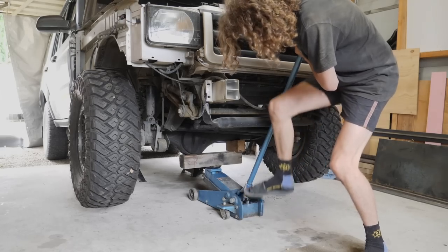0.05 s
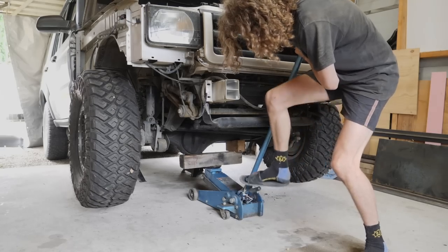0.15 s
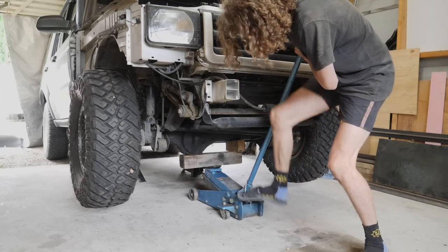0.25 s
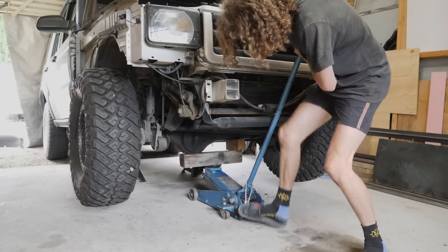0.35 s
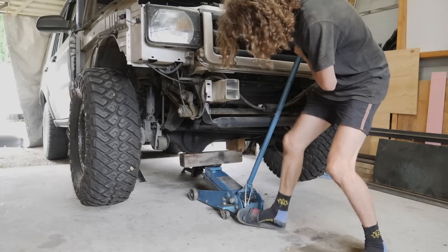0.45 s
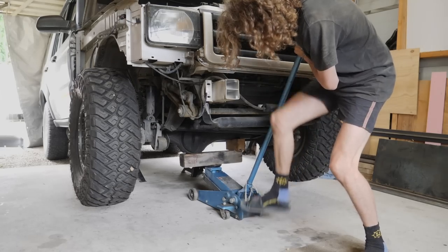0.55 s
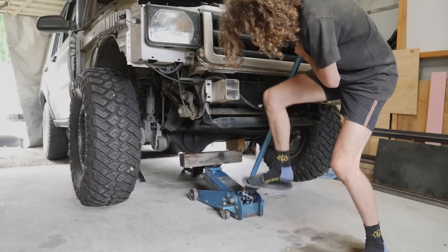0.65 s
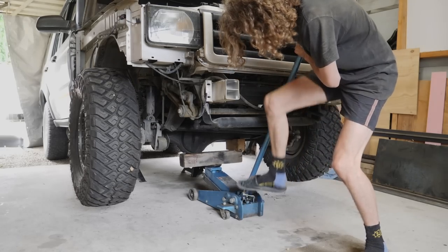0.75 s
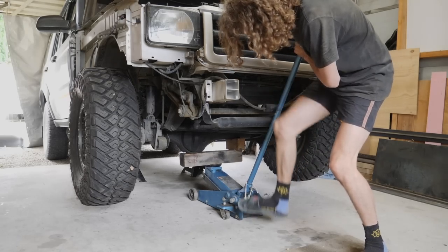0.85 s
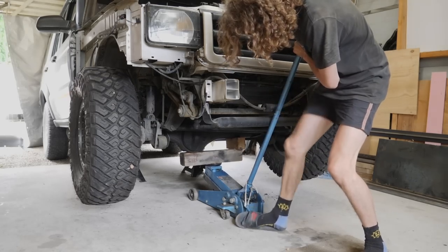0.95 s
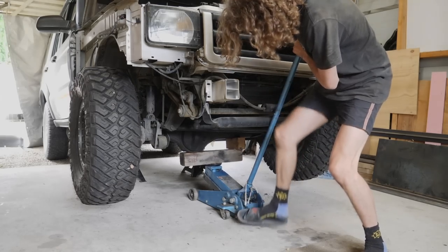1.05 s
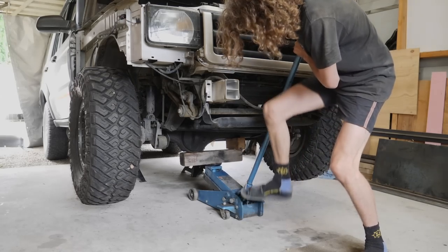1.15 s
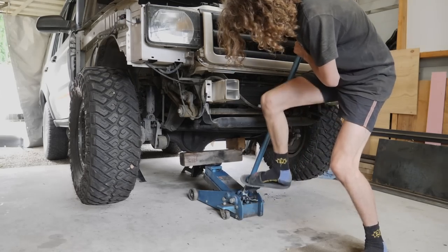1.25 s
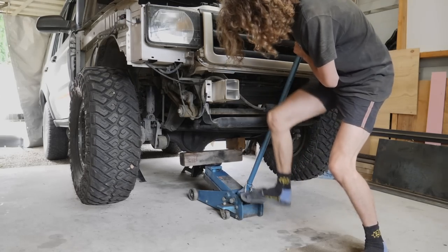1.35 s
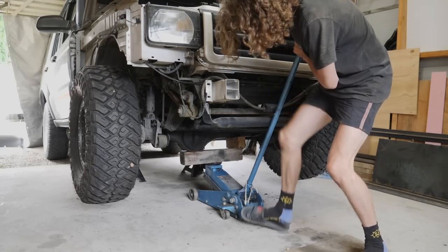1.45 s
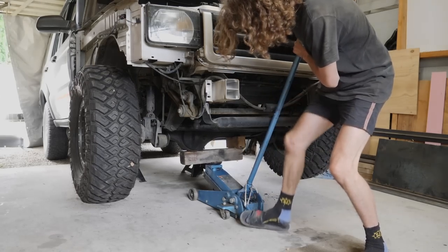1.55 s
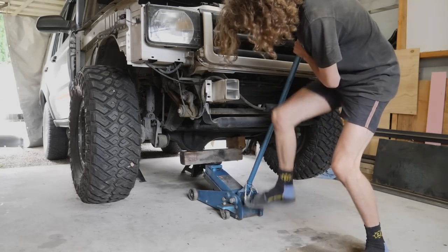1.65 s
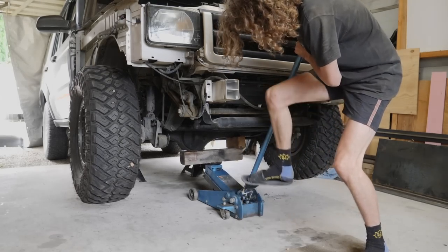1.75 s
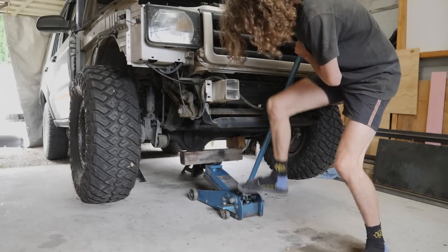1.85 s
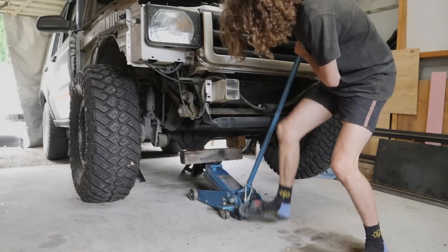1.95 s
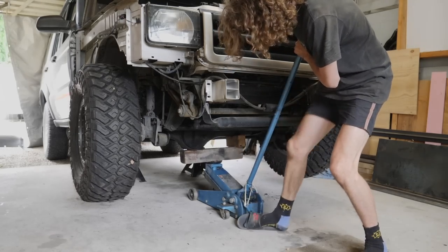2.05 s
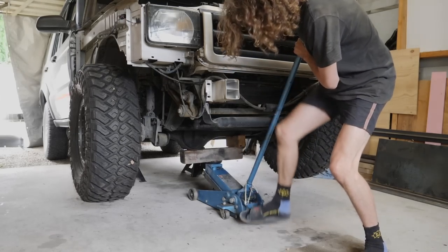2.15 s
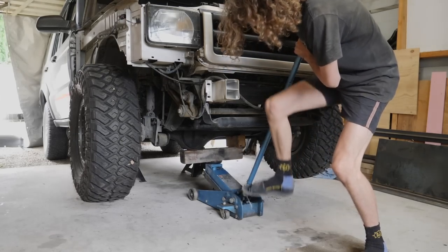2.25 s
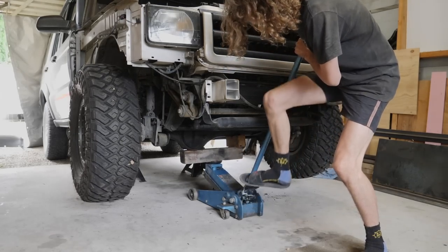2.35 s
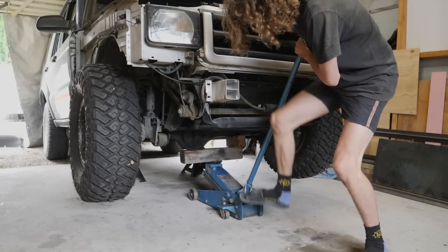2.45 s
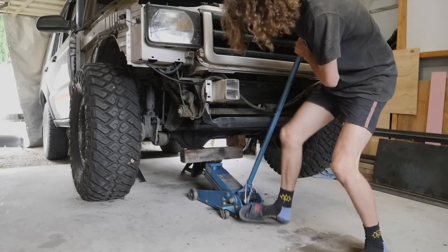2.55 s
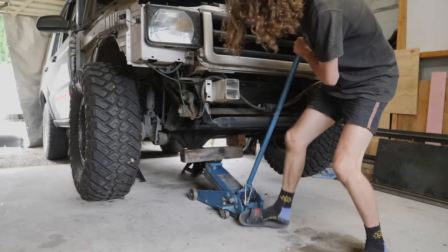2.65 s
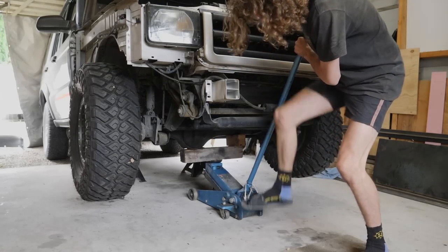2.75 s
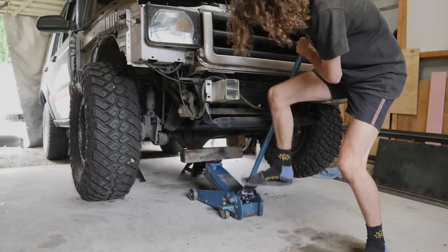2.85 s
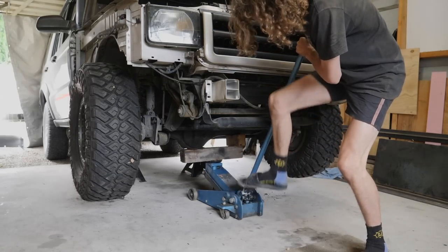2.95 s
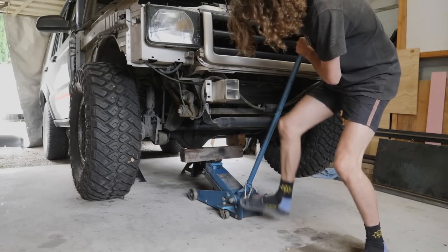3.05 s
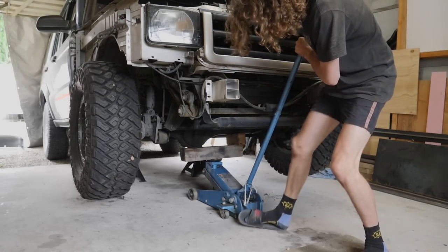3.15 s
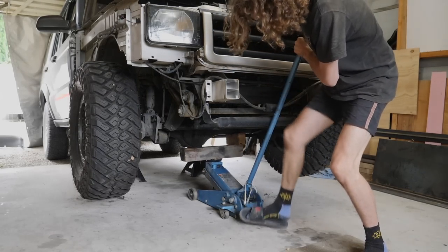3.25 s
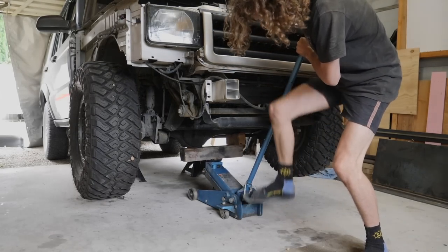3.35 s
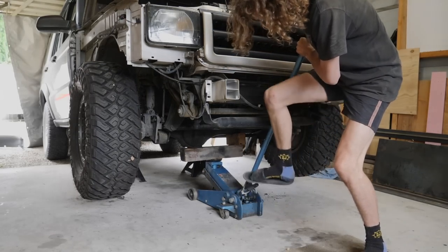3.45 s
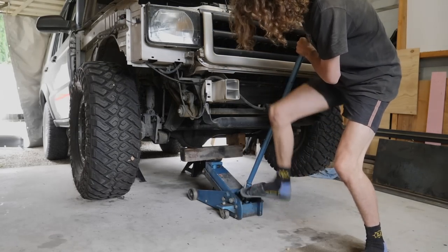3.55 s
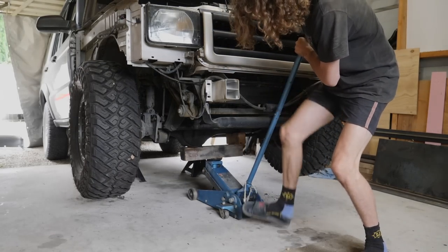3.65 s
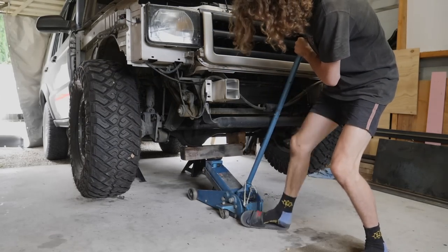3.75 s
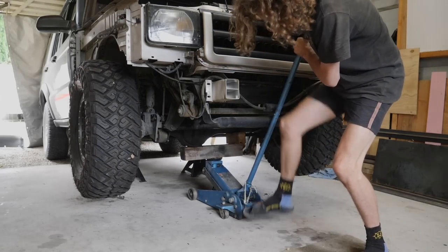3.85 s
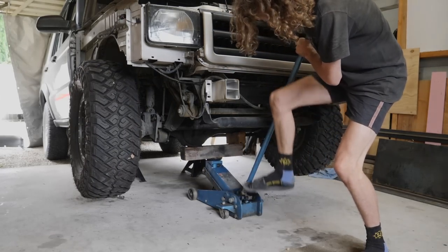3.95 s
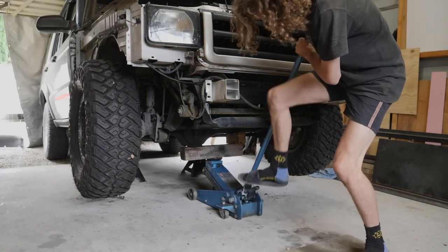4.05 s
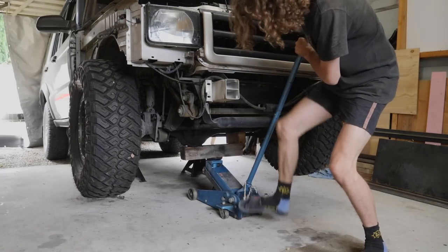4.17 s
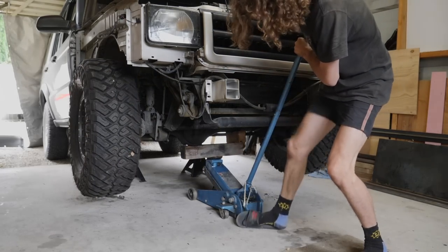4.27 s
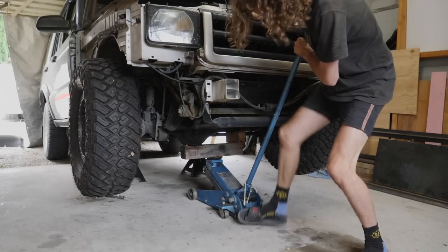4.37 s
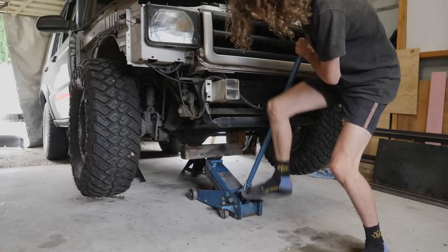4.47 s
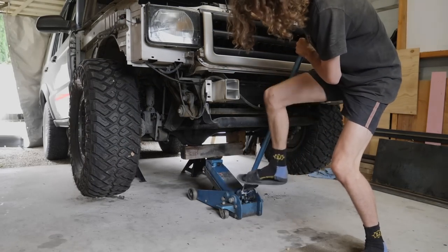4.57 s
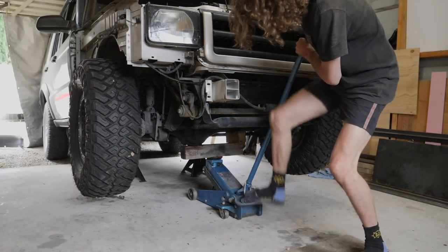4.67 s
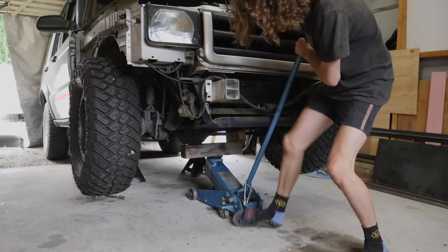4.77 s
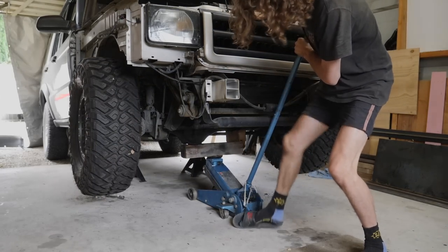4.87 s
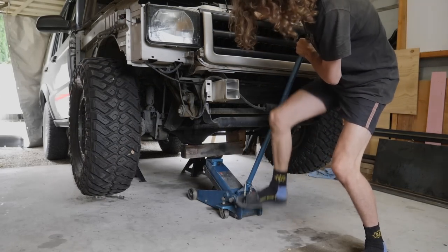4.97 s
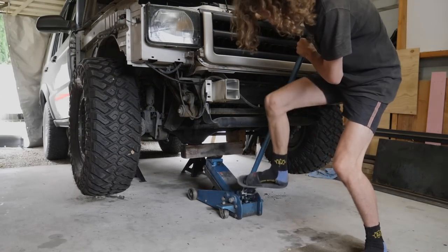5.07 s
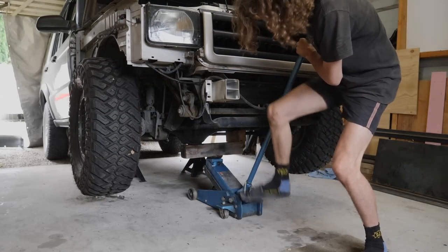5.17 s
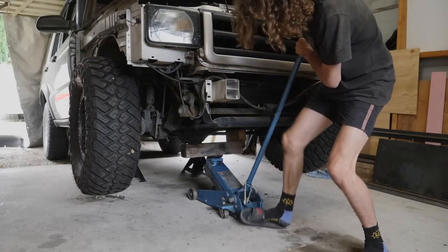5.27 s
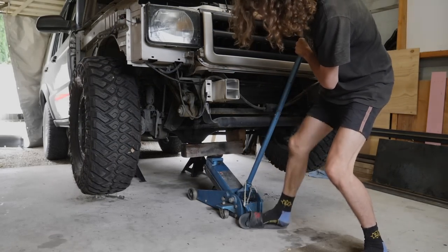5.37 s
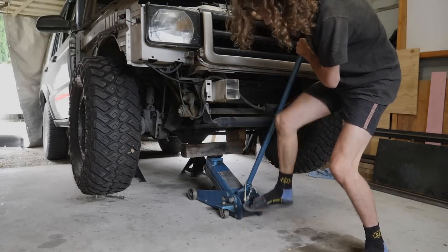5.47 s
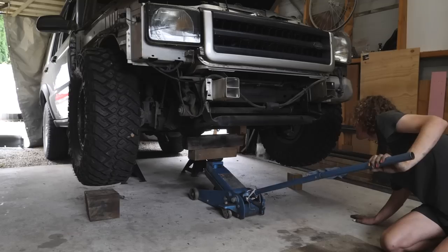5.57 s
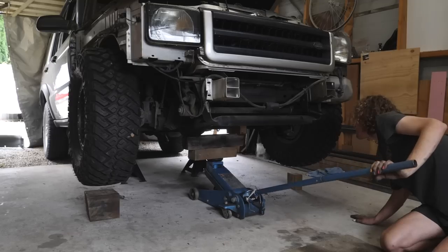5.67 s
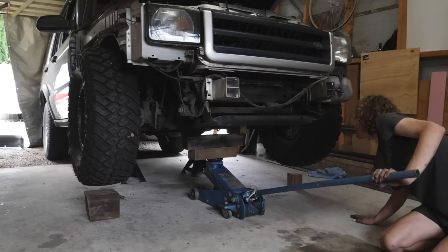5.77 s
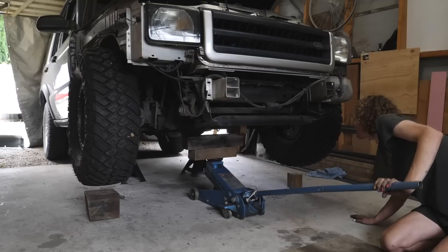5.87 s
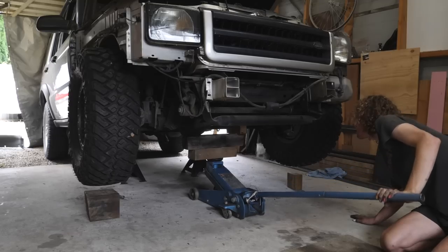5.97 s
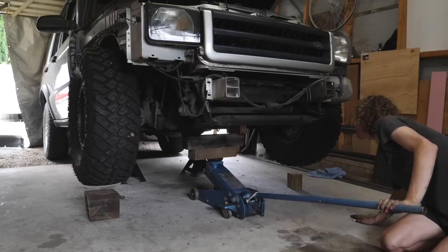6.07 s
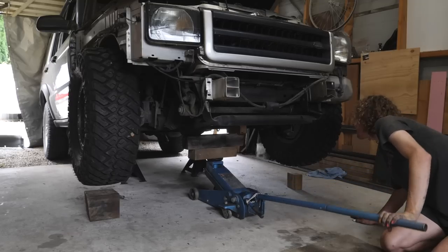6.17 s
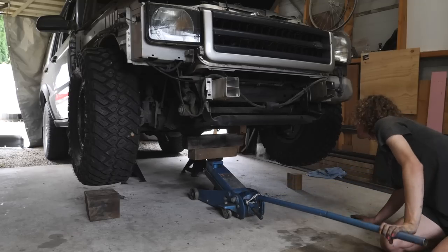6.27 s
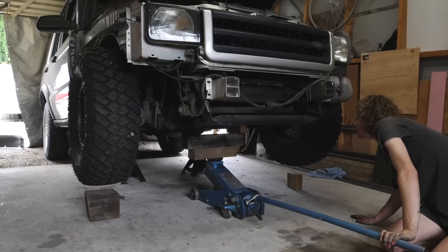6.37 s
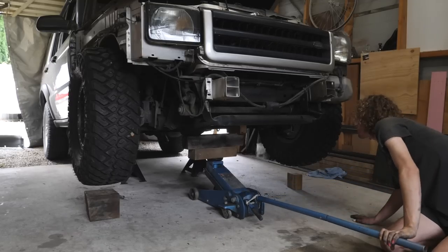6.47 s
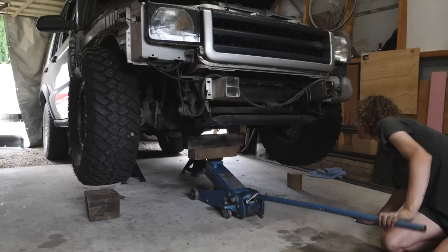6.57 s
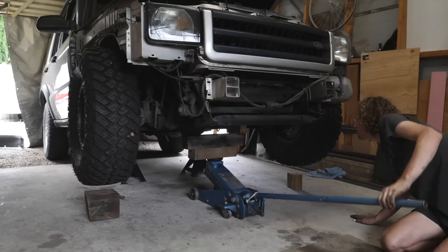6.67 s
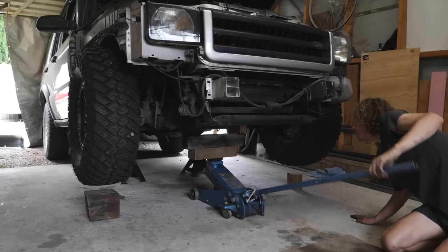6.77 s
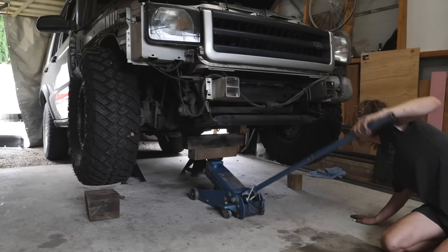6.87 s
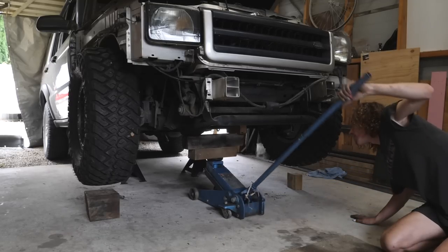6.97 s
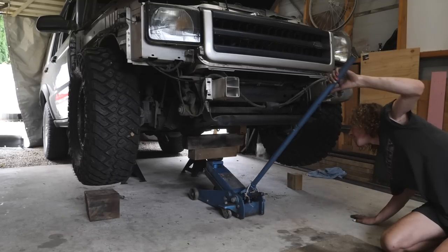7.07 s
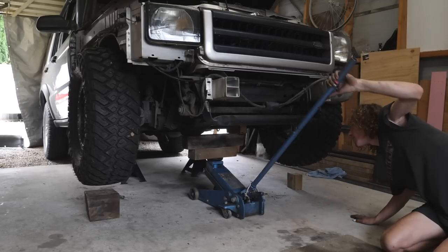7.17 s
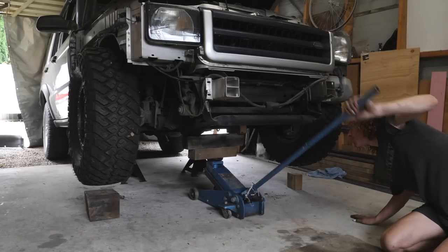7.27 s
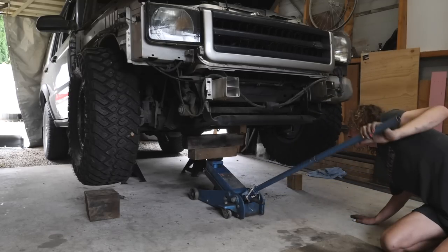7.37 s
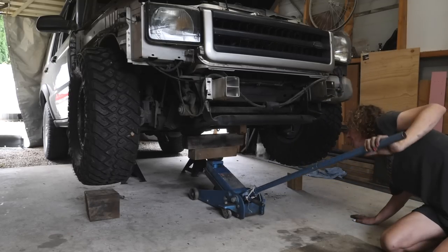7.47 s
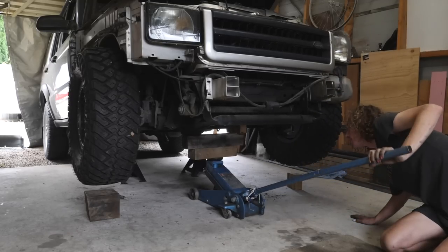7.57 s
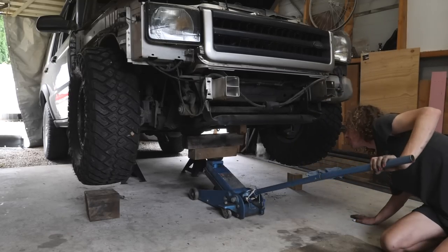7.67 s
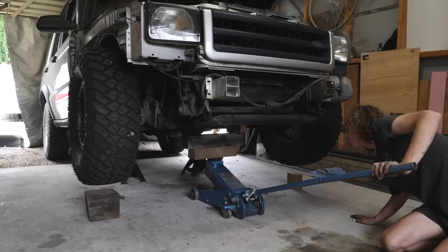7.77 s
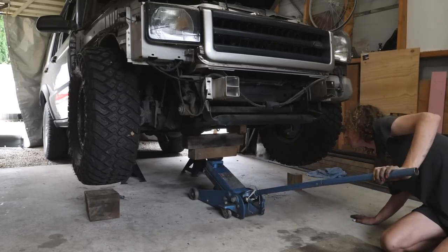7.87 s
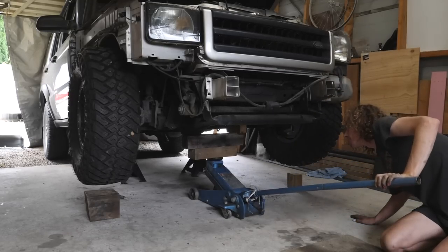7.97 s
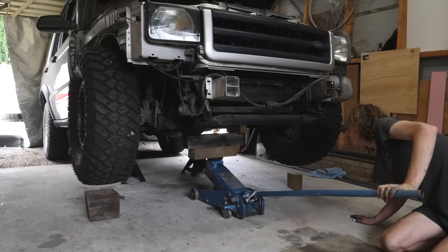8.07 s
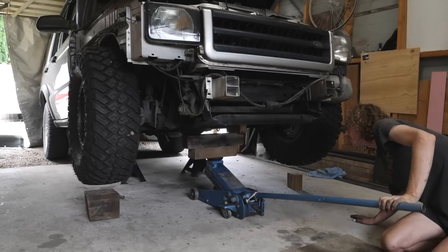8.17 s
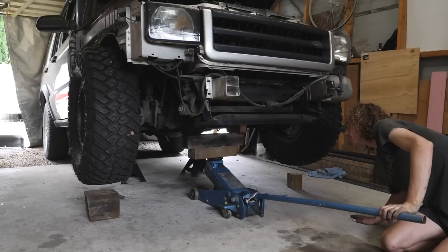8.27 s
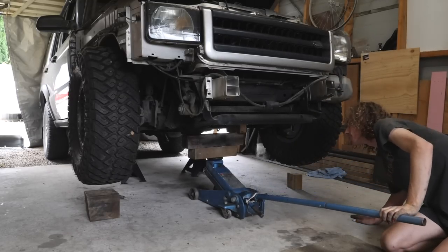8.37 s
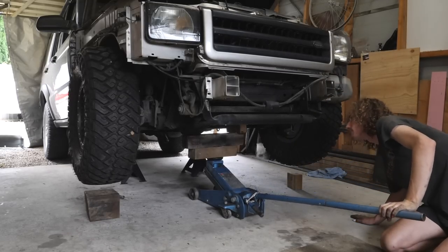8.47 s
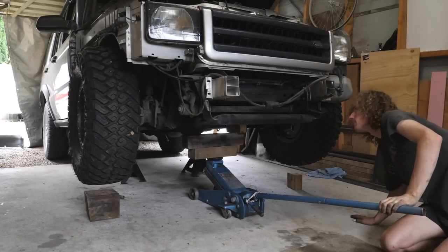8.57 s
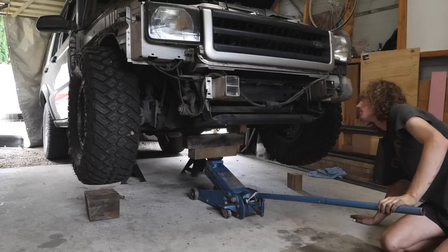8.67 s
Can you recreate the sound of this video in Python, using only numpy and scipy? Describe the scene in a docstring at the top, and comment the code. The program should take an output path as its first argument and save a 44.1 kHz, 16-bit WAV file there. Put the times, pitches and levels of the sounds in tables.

```python
"""A foot pumps the pedal of a steel floor jack about 1.8 times a second to lift a car in a garage: the linkage
clanks against the frame, a loose link clinks, the blows thud through the floor. After an abrupt cut the long
handle is worked slowly: the pivot creaks and groans, the tube ticks, the pump gulps oil.
Steel is noise chatter ringing resonant filters, thuds are short low pushes, friction and air are coloured noise."""
import sys
import numpy as np
from scipy import signal
from scipy.fft import rfft, irfft, next_fast_len
from scipy.io import wavfile
from scipy.ndimage import map_coordinates

SR = 44100
rng = np.random.default_rng(int(sys.argv[2]) if len(sys.argv) > 2 else 0)


def digitize_waveform(pressure):
    """Quantize a signal to 16-bit integers and store it at the path in sys.argv[1].

    Rows of a 2-D input are taken as channels; values are limited to [-1, 1].
    """
    field = np.atleast_2d(pressure).T
    bounded = np.clip(field, -1, 1)
    quanta = np.round(bounded * 32767).astype(np.int16)
    wavfile.write(sys.argv[1], SR, quanta)


N = 384552
CUT_S = 5.522  # pedal before, handle after
SIZE = 24000  # samples in one sound event
TIME = np.arange(N) / SR
AGE = np.arange(SIZE) / SR  # seconds since an event began
HZ = np.fft.rfftfreq(SIZE, 1 / SR)


def amp(db):
    """Decibels to gain."""
    return 10 ** (np.asarray(db) / 20)


def unit_rms(x):
    """Scale to rms 1."""
    return x / np.sqrt(np.mean(x ** 2) + 1e-20)


def unit_energy(x):
    """Scale to energy 1."""
    return x / (np.linalg.norm(x) + 1e-20)


def along(points, hz):
    """Join (Hz, value) points on a log frequency axis."""
    f, v = np.transpose(points)
    return np.interp(np.log(hz + 1), np.log(f + 1), v)


def curve(rows):
    """Join (s, value) points, one value per sample."""
    return np.interp(TIME, *np.transpose(rows))


def add(track, s, sound):
    """Mix a sound in at time s; what starts before the cut ends there."""
    start = max(round(s * SR), 0)
    limit = round(CUT_S * SR) if s < CUT_S else N
    end = min(start + len(sound), limit)
    track[start:end] += sound[:end - start]


def coloured(x, spectrum):
    """Give a whole track a spectrum, at rms 1."""
    m = next_fast_len(N + SIZE)
    gain = amp(along(spectrum, np.fft.rfftfreq(m, 1 / SR)))
    return unit_rms(irfft(rfft(x, m) * gain, m)[:N])


def body(spectrum, modes=()):
    """Gain of an object over HZ: a broad colour with resonant peaks, mean power 1."""
    peaks_db = sum(db / (1 + (2 * (HZ - hz) / width) ** 2) for hz, width, db in modes)
    return unit_rms(amp(along(spectrum, HZ) + peaks_db))


def ring(force, gain):
    """Pass a force through the causal filter with this gain, so that peaks ring after the blow."""
    cepstrum = irfft(np.log(np.maximum(gain, 1e-6)))
    # folding the cepstrum forward in time makes the filter minimum phase
    cepstrum[1:SIZE // 2] *= 2
    cepstrum[SIZE // 2 + 1:] = 0
    return irfft(rfft(force) * np.exp(rfft(cepstrum)))


def garage(build_s=0.0014):
    """A fresh reverberant tail of energy 1: noise that dies at its own pace in each band."""
    # Decay time of the room: f/Hz, t60/s
    decay = [(100, 0.25), (250, 0.4), (600, 0.28), (1700, 0.24), (4800, 0.25), (11000, 0.21)]
    hz, t, z = signal.stft(rng.standard_normal(SIZE), SR, nperseg=256)
    fade = amp(-60 * t / along(decay, hz)[:, None])
    tail = signal.istft(z * fade, SR, nperseg=256)[1][:SIZE]
    return unit_energy(tail * (1 - np.exp(-AGE / build_s)))


def chatter(t60, crack, crack_t60=0.0073, rise_s=0.0013):
    """Steel meeting steel: a first crack, then a dying run of uneven micro-bounces."""
    bounces = rng.standard_normal(SIZE) * rng.exponential(size=SIZE) * amp(-60 * AGE / t60)
    first = rng.standard_normal(SIZE) * amp(-60 * AGE / crack_t60)
    seating = 1 - np.exp(-AGE / rise_s)
    return unit_energy(unit_energy(bounces * seating) + crack * unit_energy(first * seating))


def strike_point(depth_db):
    """Each contact lands on a new spot and favours other narrow modes; in the treble they even out."""
    mode_number = 36 * np.log1p(HZ / 900)
    favour = map_coordinates(rng.standard_normal(128), [mode_number], mode="mirror")
    return depth_db / (1 + (HZ / 5500) ** 2) * favour


def contact(gain, t60, crack, room_db):
    """One blow: the chatter rings the steel, heard directly and through the garage."""
    # Share of the energy that arrives directly: f/Hz, share
    direct_share = [(500, 0.3), (1700, 0.16), (4800, 0.51), (11000, 0.75)]
    share = np.clip(along(direct_share, HZ), 0, 1)
    direct = rfft(chatter(t60, crack)) * np.sqrt(share)
    walls = rfft(garage()) * np.sqrt(1 - share) * amp(room_db)
    uneven = gain * amp(strike_point(3.0))
    same_energy = np.linalg.norm(gain) / np.linalg.norm(uneven)
    return ring(irfft(direct + walls), uneven * same_energy)


def blows(rows, force, steel, t60, crack, room_db, gain_db, low_hz=260):
    """Contacts (s, dB, dB per octave) of one kind on one steel part; small parts radiate little bass."""
    track = np.zeros(N)
    radiated = HZ ** 2 / np.sqrt(HZ ** 4 + low_hz ** 4)
    octaves = np.log2(np.clip(HZ, 550, 11000) / 2500)
    for s, db, brightness in rows:
        hardness = amp(db + gain_db + along(force, HZ) + brightness * octaves)
        add(track, s, contact(steel * hardness * radiated, t60, crack, room_db))
    return track


def alike(times, levels_db):
    """Rows (s, dB, brightness) of blows that share one colour."""
    return [(s, db, 0) for s, db in np.broadcast(times, levels_db)]


def background(pedal_db=-49.5, handle_db=-50.5, waver_db=3):
    """Air through the open door is shaped noise; after the cut a faint hum and a thin, wavering hiss join it."""
    # Air before the cut: f/Hz, level/dB
    air_pedal = [(15, -49), (25, -17), (134, 6.5), (236, -7.5), (427, -1.5), (545, -3), (1190, -3),
                 (1560, -12), (1840, -8), (5000, -15.5), (7510, -25.5), (14000, -33), (16000, -48)]
    # Air after the cut: f/Hz, level/dB
    air_handle = [(15, -50), (25, -21), (102, -3.5), (161, -11.5), (217, -6), (242, -13.5), (476, -12),
                  (575, -17.5), (754, -11.5), (2910, -33.5), (3620, -27), (3920, -30), (6210, -33),
                  (6740, -38), (16000, -40)]
    # Faint steady tone after the cut: f/Hz, rms level/dB
    hum_tones = [(102.3, -65.5)]
    # Colour of the narrow hiss: f/Hz, level/dB
    whisper_colour = [(3000, -45), (3470, -9), (3530, 11), (3630, 4), (3720, -25), (4300, -45)]
    # Course of the hiss, before its waver: t/s, level/dB
    whisper_level = [(5.53, -78), (5.72, -69), (5.92, -63), (6.3, -66), (6.6, -71), (7.4, -68), (7.55, -59),
                     (7.8, -70), (8.72, -71)]
    before = amp(pedal_db) * coloured(rng.standard_normal(N), air_pedal)
    after = amp(handle_db) * coloured(rng.standard_normal(N), air_handle)
    hum = sum(amp(db) * np.sqrt(2) * np.sin(2 * np.pi * hz * TIME) for hz, db in hum_tones)
    waver = waver_db * map_coordinates(rng.standard_normal(60), [TIME * 5], mode="mirror")
    whisper = amp(curve(whisper_level) + waver) * coloured(rng.standard_normal(N), whisper_colour)
    return np.where(TIME < CUT_S, before, after + hum + whisper)


def rubbing(lump_hz=30, lump_db=3):
    """A dull, uneven friction that swells and fades as the handle moves."""
    # Soft rubs: middle t/s, half length/s, peak level/dB
    rubs = [(5.93, 0.21, -52.5), (7.14, 0.035, -42.5), (7.684, 0.032, -42.5), (7.854, 0.031, -49)]
    # Colour of the rub: f/Hz, level/dB
    rub_colour = [(100, -30), (280, -8), (420, 2), (600, -7.5), (900, -1.5), (1400, -25), (3000, -21.5),
                  (15000, -75)]
    lumps = amp(lump_db * map_coordinates(rng.standard_normal(600), [TIME * lump_hz], mode="mirror"))
    swells = sum(amp(db) / (1 + ((TIME - s) / half_s) ** 2) for s, half_s, db in rubs)
    friction = unit_rms(lumps * coloured(rng.standard_normal(N), rub_colour))
    return (TIME > CUT_S) * swells * friction


def sliding(gain_db=-5, grain=1.0):
    """Steel slides on steel in the moving joints: noise of very uneven, fine grains."""
    # Course of the sliding, before the gain: t/s, level/dB
    slide_level = [(0, -57), (1.6, -56), (1.85, -36), (2.4, -47), (2.7, -66), (3.9, -52), (4.6, -41.5),
                   (5.35, -49), (5.53, -55.5), (6.55, -55.5), (6.88, -44), (7.05, -45), (7.4, -37),
                   (7.55, -49), (7.75, -50.5), (8.1, -54.5), (8.72, -49.5)]
    # Colour of the scrape: f/Hz, level/dB
    scrape_colour = [(200, -42), (800, -0.5), (1500, -6.5), (3500, -11), (6000, -20.5), (8000, -27),
                     (15000, -40)]
    grains = rng.standard_normal(N) * np.exp(grain * rng.standard_normal(N))
    return amp(curve(slide_level) + gain_db) * coloured(grains, scrape_colour)


def gulps(t60=0.79, rise_s=0.0039, dull_s=0.29):
    """Oil is drawn through the valve as the handle turns upward: a rush that dulls as the flow dies."""
    # Gulps: t/s, level/dB
    draws = [(6.408, -26), (8.430, -26.5)]
    # Colour of the oil: f/Hz, level/dB
    oil_colour = [(88, -52), (150, -21), (305, -11.5), (516, -1), (747, -5), (858, 3), (1170, -5),
                  (1520, -8.5), (1670, -14), (3830, -31.5), (6000, -55), (7800, -73), (13200, -120)]
    track = np.zeros(N)
    for s, db in draws:
        rush = unit_rms(ring(rng.standard_normal(SIZE), body(oil_colour)))
        dull = signal.lfilter(*signal.butter(2, 900, fs=SR), rush)
        bright = np.exp(-AGE / dull_s)
        flow = (1 - np.exp(-AGE / rise_s)) * amp(db - 60 * AGE / t60)
        add(track, s, flow * (bright * rush + (1 - bright) * dull))
    return track


def groan(slip_hz=135, scatter=0.35, pivot_hz=1210, width_hz=90, boost_db=9, room_db=-1):
    """The dry pivot sticks and slips at the top of the stroke; uneven slips ring one strong resonance."""
    # Course of the groan: t/s, level/dB
    groan_level = [(7.340, -22), (7.346, -17.5), (7.354, -16), (7.369, -17.5), (7.385, -31), (7.41, -35),
                   (7.44, -61)]
    # Colour of the pivot: f/Hz, level/dB
    pivot_colour = [(120, -32), (200, -27), (941, -12), (1200, -4), (1340, -9.5), (1850, -19.5),
                    (2080, -19), (2350, -29), (3980, -43), (5000, -37), (6500, -40), (11000, -120)]
    wander = map_coordinates(rng.standard_normal(2000), [TIME * slip_hz], order=1)
    rate = slip_hz * np.exp(scatter * wander)
    slips = np.diff(np.floor(np.cumsum(rate) / SR), prepend=0)
    pivot = body(pivot_colour, [(pivot_hz, width_hz, boost_db)])
    answer = ring((AGE == 0) + amp(room_db) * garage(), pivot)
    sounding = (TIME > groan_level[0][0]) * (TIME < groan_level[-1][0])
    force = slips * np.sqrt(SR / slip_hz) * amp(curve(groan_level)) * sounding
    return signal.fftconvolve(force, unit_energy(answer))[:N]


def creaks(t60=0.063, crack=0.23, room_db=-4, gain_db=27.5):
    """The handle catches in its pivot as it is raised: short rasping slips, sharper near the top."""
    # Catches, before the gain: t/s, level/dB
    catches = [(6.300, -25.5), (6.806, -31.5), (6.853, -26.5), (6.904, -28), (7.109, -34), (7.126, -26.5),
               (7.176, -26), (7.197, -32), (7.230, -28), (7.263, -25), (7.282, -29.5), (7.298, -26.5)]
    # Broad colour of the pivot's creak: f/Hz, level/dB
    creak_colour = [(40, -43), (300, -10), (650, -5.5), (1000, 3.5), (1500, -4), (2000, -4), (2700, 0.5),
                    (4200, -10), (6000, -13.5), (7500, -33), (15000, -39.5)]
    # Its resonances: f/Hz, width/Hz, boost/dB
    creak_modes = [(1260, 150, 6), (1780, 78, 1), (2520, 150, 1.5)]
    # Treble of the slips along the stroke: t/s, level/dB
    creak_treble = [(6.3, -7), (7.2, -6), (7.27, 2)]
    track = np.zeros(N)
    steel = body(creak_colour, creak_modes)
    for s, db in catches:
        treble_db = np.interp(s, *np.transpose(creak_treble))
        tilt_db = along([(1700, 0), (4800, treble_db)], HZ)
        add(track, s, contact(steel * amp(db + gain_db + tilt_db), t60, crack, room_db))
    return track


def ticks():
    """The handle tube shifts in its socket: light, crisp contacts ring it."""
    # Ticks, before the gain: t/s, level/dB
    shifts = [(5.904, -41.5), (6.951, -42.5), (7.435, -23.5), (7.535, -44.5), (7.6, -33.5), (8.096, -52),
              (8.185, -35), (8.307, -41), (8.64, -42.5)]
    # Broad colour of the tube: f/Hz, level/dB
    handle_colour = [(40, 6), (600, -6), (1200, 1.5), (2500, -3), (5000, -14.5), (9000, -23.5),
                     (15000, -21.5)]
    # Its resonances: f/Hz, width/Hz, boost/dB
    handle_modes = [(1010, 89, 3.6), (1079, 60, 10.6), (1377, 45, 9), (1805, 65, 9.2), (2420, 46, 9.3),
                    (3523, 370, 20), (4660, 280, 8.7), (5140, 660, 16.4), (7160, 180, 11), (7840, 550, 12)]
    # Crisp contact force: f/Hz, level/dB
    tick_force = [(550, -2), (1700, 1.5), (4800, 0.5), (11000, 7.5)]
    tube = body(handle_colour, handle_modes)
    return blows(alike(*np.transpose(shifts)), tick_force, tube, t60=0.033, crack=0.59, room_db=0, gain_db=28.5)


def knocks(room_db=-3, gain_db=3):
    """Short dry knocks: a single dull impulse each, coloured by a body without narrow modes."""
    # Knocks: t/s, peak level before the gain/dB
    dry_knocks = [(1.024, -28), (2.102, -24.5), (4.338, -16.5), (5.372, -21)]
    # Colour of a knock: f/Hz, level/dB
    knock_colour = [(100, -8.5), (400, 6.5), (800, 10), (1300, 1.5), (2000, -19), (4000, -30), (7000, -35),
                    (15000, -46)]
    track = np.zeros(N)
    for s, db in dry_knocks:
        knock = ring((AGE == 0) + amp(room_db) * garage(), body(knock_colour))
        add(track, s, amp(db + gain_db) * knock / np.abs(knock).max())
    return track


def thuds(times, levels_db, thud_hz=140, swell_s=0.0062, echo_s=0.0152, echo=0.56, room_db=-8):
    """One low push per blow; it flutters twice between floor and ceiling and rings the chassis."""
    # Low chassis modes: f/Hz, level/dB, t60/s
    chassis_modes = [(206.7, -20.5, 0.49), (360, -39, 0.28)]
    track = np.zeros(N)
    swell = (AGE / swell_s) ** 2 * np.exp(2 - 2 * AGE / swell_s)
    push = -np.sin(2 * np.pi * thud_hz * AGE) * swell
    flutter = sum(echo ** k * np.interp(AGE - k * echo_s, AGE, push, left=0) for k in range(3))
    for s, db in np.broadcast(times, levels_db):
        walls = signal.fftconvolve(push, garage())[:SIZE]
        chassis = np.zeros(SIZE)
        for hz, level, t60 in chassis_modes:
            decay = amp(level + rng.normal(0, 1.8) - 60 * AGE / t60)
            chassis += decay * np.sin(2 * np.pi * hz * AGE)
        add(track, s, amp(db) * (flutter + chassis + amp(room_db) * walls))
    return track


def rattles(times, levels_db, gain_db, count=5, spread_s=0.015, scatter_db=3, settle_db_per_s=200, room_db=-4):
    """After each blow before the cut loose linkage pins fall back in tiny, sharp clicks, the later the weaker."""
    force = np.zeros(N)
    for s, db in zip(times, levels_db):
        for delay, size in zip(rng.gamma(2, spread_s / 2, count), rng.standard_normal(count)):
            click_db = db + gain_db + scatter_db * size - settle_db_per_s * delay
            add(force, s + delay, [amp(click_db)])
    pin_colour = [(300, -16), (1500, 0), (4500, 2), (8000, -1.5), (15000, -12)]  # f/Hz, level/dB
    pin = ring((AGE == 0) + amp(room_db) * garage(), body(pin_colour))
    return signal.fftconvolve(force, pin)[:N] * (TIME < CUT_S)


def touches(times, levels_db, frame, lead_s=0.008, relative_db=-20):
    """The parts graze lightly just before they meet."""
    # Soft grazing force: f/Hz, level/dB
    touch_force = [(550, 9.5), (1700, 5), (4800, -1), (11000, 1)]
    rows = alike(times - lead_s, levels_db + relative_db)
    return blows(rows, touch_force, frame, t60=0.069, crack=0.6, room_db=-2.0, gain_db=28.0)


def dull_taps(frame):
    """Dull taps on the frame: most as the pedal reaches the end of its travel, two as the handle moves."""
    # Taps, before the gain: t/s, level/dB
    tap_rows = [(0.71, -26.5), (1.262, -24.5), (1.78, -23.5), (2.333, -21.5), (2.894, -27.5), (3.485, -27),
                (4.59, -25), (4.613, -28), (5.131, -26.5), (6.64, -27.5), (6.825, -30.5)]
    # Dull contact force: f/Hz, level/dB
    tap_force = [(550, -11.5), (1700, 0.5), (4800, -27.5), (11000, -9)]
    rows = alike(*np.transpose(tap_rows))
    return blows(rows, tap_force, frame, t60=0.035, crack=0.44, room_db=-0.5, gain_db=26.0)


def further_clanks(frame, thud_db=-29.5):
    """Uneven clanks on the frame from pedal and handle, with touch and low thud; before the cut a rattle."""
    # Clanks, before the gain: t/s, level/dB, brightness/(dB per octave)
    clank_rows = [(0.049, -20, -0.8), (0.482, -27, -2.5), (0.604, -19.5, 0), (0.821, -22.5, 0),
                  (1.039, -33, -3.5), (1.805, -11, 1.9), (2.091, -31.5, 3.5), (2.244, -19.5, 0.5),
                  (2.364, -19, 0), (2.727, -31.5, 1), (2.957, -37, -1), (3.015, -38.5, -5),
                  (3.578, -31, -2.5), (4.036, -7, 1.55), (4.084, -22.5, -2), (4.454, -22, 2),
                  (4.847, -37, -7), (5.307, -35, 0), (5.339, -29.5, -0.5), (5.459, -33, 0.5),
                  (6.658, -16, 0.1), (7.373, -15, -1.1), (7.718, -39, 0.5)]
    # Force of these clanks: f/Hz, level/dB
    clank_force = [(280, -2.5), (550, -4), (1700, 0.5), (4800, -3.5), (11000, -5.5)]
    times, levels_db, _ = np.transpose(clank_rows)
    steel = touches(times, levels_db - 9.5, frame)
    steel += blows(clank_rows, clank_force, frame, t60=0.038, crack=0.36, room_db=-0.5, gain_db=26.0)
    return steel + thuds(times, levels_db + thud_db) + rattles(times, levels_db, gain_db=-3)


def upstrokes(frame, bounce_after_s=0.017, bounce_db=-23.5, thud_after_s=0.0108, thud_db=-31):
    """The foot lifts: the pedal springs back with a clunk, thud and bounce, then the loose link clinks over."""
    # Strokes, before the gains: t/s, clunk level/dB, clink delay/s, clink level/dB,
    # clink brightness/(dB per octave)
    lifts = [(0.008, -22.5, 0.027, -20.5, 0), (0.564, -20, 0.03, -20, -0.5),
             (1.115, -19, 0.037, -26.5, -3.5), (1.655, -23, 0.033, -20.5, -1.2),
             (2.205, -20, 0.028, -26, -0.1), (2.757, -22.5, 0.046, -20.5, 0.5),
             (3.326, -22.5, 0.04, -17.5, 2.5), (3.889, -23.5, 0.0435, -19, 1.5),
             (4.440, -23.5, 0.031, -18, 0.5), (4.964, -22.5, 0.032, -18.5, -1),
             (5.482, -26, 0.019, -25.5, -1)]
    # Broad colour of the link: f/Hz, level/dB
    link_colour = [(40, -27), (250, -11.5), (800, -0.5), (2000, -9), (4500, -6), (6500, -12.5), (8000, -17),
                   (15000, -24)]
    # Its resonances: f/Hz, width/Hz, boost/dB
    link_modes = [(269, 23, 4.7), (332, 12, 22), (524, 22, 5), (560, 5, 27), (1038, 175, 10.2),
                  (1275, 32, 5.7), (4640, 470, 7.6), (6480, 730, 12.3), (11220, 440, 11), (12900, 540, 16)]
    # Forces of the three contacts: f/Hz, level/dB
    clunk_force = [(280, 9), (520, 11), (950, 4.5), (1700, -0.5), (4800, -4.5), (11000, -9.5)]
    bounce_force = [(550, -21), (1700, 1), (4800, 2.5), (11000, -4.5)]
    clink_force = [(560, -14), (1100, 0), (1700, 2), (4800, 1), (11000, -2.5)]
    clunk_s, clunk_db, delay_s, clink_db, clink_bright = np.transpose(lifts)
    link = body(link_colour, link_modes)
    clunk_rows = alike(clunk_s, clunk_db)
    bounce_rows = alike(clunk_s + bounce_after_s, bounce_db)
    clink_rows = zip(clunk_s + delay_s, clink_db, clink_bright)
    steel = touches(clunk_s, clunk_db, frame)
    steel += blows(clunk_rows, clunk_force, frame, t60=0.046, crack=0.78, room_db=-2.5, gain_db=27.0)
    steel += blows(bounce_rows, bounce_force, frame, t60=0.029, crack=0.82, room_db=-0.5, gain_db=21.5)
    steel += blows(clink_rows, clink_force, link, t60=0.025, crack=0.47, room_db=-1.0, gain_db=26.0)
    return steel + thuds(clunk_s + thud_after_s, thud_db) + rattles(clunk_s, clunk_db, gain_db=2)


def downstrokes(frame, bottom_after_s=0.171, bottom_db=-35.5):
    """The foot presses: the linkage clicks, seats under load with clank, thud and rattle, then bottoms out."""
    # Strokes, before the gains: t/s, click level/dB, click brightness/(dB per octave), clank delay/s,
    # clank level/dB, clank brightness/(dB per octave), thud level/dB
    presses = [(0.268, -19, 0, 0.022, -15, 1.5, -27.5), (0.829, -21, 3.5, 0.020, -10.5, -1.55, -25.5),
               (1.362, -20, 0.1, 0.022, -11, 0, -25), (1.922, -18, 0.4, 0.018, -4.5, 0.05, -27),
               (2.470, -19, -0.7, 0.018, -7.5, 1.5, -25), (3.034, -15.5, 1.5, 0.015, -12, 0.7, -31.5),
               (3.591, -22.5, -2, 0.024, -16, -2, -35), (4.161, -21.5, -2.1, 0.0195, -6, -0.2, -28),
               (4.692, -19.5, 0.5, 0.028, -13.5, -0.6, -24.5), (5.205, -26.3, -2.5, 0.057, -31, -3, -36.5)]
    # Forces of the three contacts: f/Hz, level/dB
    click_force = [(550, -8), (1700, -1), (4800, 0.6), (11000, 11.5)]
    load_force = [(280, -2.5), (520, 0), (850, 0), (1700, -0.25), (4800, -7.5), (11000, -10)]
    bottom_force = [(550, -2.5), (1700, -0.5), (4800, 0.5), (11000, -6.5)]
    click_s, click_db, click_bright, delay_s, clank_db, clank_bright, thud_db = np.transpose(presses)
    clank_s = click_s + delay_s
    click_rows = zip(click_s, click_db, click_bright)
    clank_rows = zip(clank_s, clank_db, clank_bright)
    bottom_rows = alike(click_s + bottom_after_s, bottom_db)
    steel = touches(click_s, click_db + 3.5, frame)
    steel += blows(click_rows, click_force, frame, t60=0.034, crack=0.36, room_db=-0.55, gain_db=26.5)
    steel += blows(clank_rows, load_force, frame, t60=0.046, crack=0.66, room_db=-1.0, gain_db=26.0)
    steel += blows(bottom_rows, bottom_force, frame, t60=0.068, crack=0.88, room_db=-3.5, gain_db=26.0)
    return steel + thuds(clank_s, thud_db) + rattles(clank_s, clank_db, gain_db=-7.5)


def scene():
    """All parts of the jack over the background, in mono."""
    # Broad colour of the steel frame: f/Hz, level/dB
    frame_colour = [(40, -36), (170, -17), (280, -10), (450, -14), (750, 0.5), (1300, -5.5), (2000, -6),
                    (3200, -6), (6200, -20.5), (7800, -30.5), (12500, -28), (15000, -38)]
    # Its resonances: f/Hz, width/Hz, boost/dB
    frame_modes = [(197, 35, 5.4), (318, 12, 0.84), (337.6, 20.6, 8.7), (371, 24, 1.7), (404.5, 18, 5.4),
                   (479.6, 14, 6.5), (521, 22, 4.5), (554.5, 18, 7.8), (686.4, 54, 5.6),
                   (1202.5, 30.5, 9.7), (1342, 110, 3.7), (1820, 85, 2.5), (5350, 1540, 6.1),
                   (6820, 1100, 5.2), (8200, 1130, 5.1), (11360, 260, 4)]
    frame = body(frame_colour, frame_modes)
    pedal = downstrokes(frame) + upstrokes(frame)
    pedal_and_handle = dull_taps(frame) + further_clanks(frame) + sliding() + knocks()
    handle = creaks() + groan() + ticks() + gulps() + rubbing()
    return (pedal + pedal_and_handle + handle + background())[None]


def record(dry, top_hz=15900):
    """A sharp band limit: nothing remains above top_hz."""
    m = next_fast_len(N + SIZE)
    passed = np.fft.rfftfreq(m, 1 / SR) < top_hz
    return irfft(rfft(dry, m) * passed, m)[:, :N]


dry = scene()
out = record(dry)
digitize_waveform(out)
```